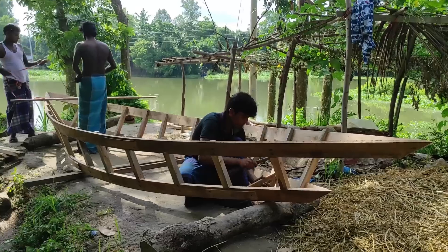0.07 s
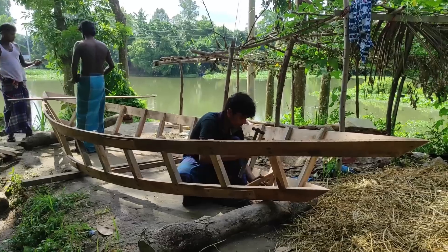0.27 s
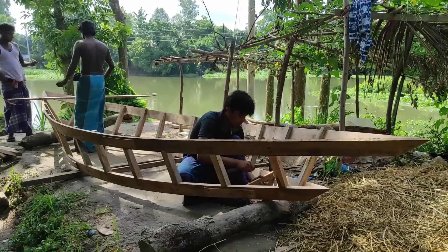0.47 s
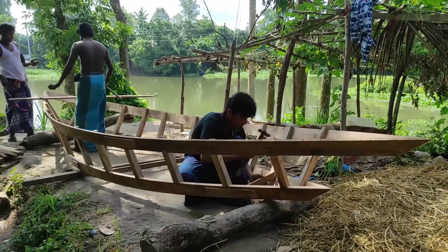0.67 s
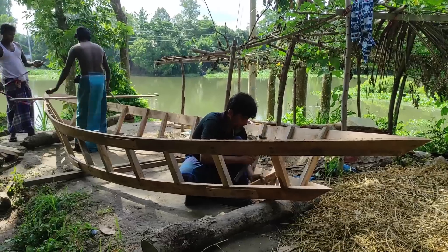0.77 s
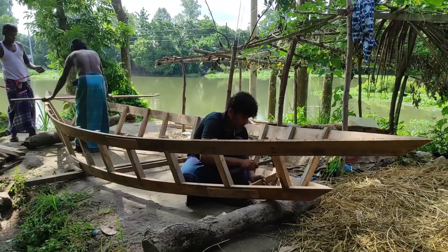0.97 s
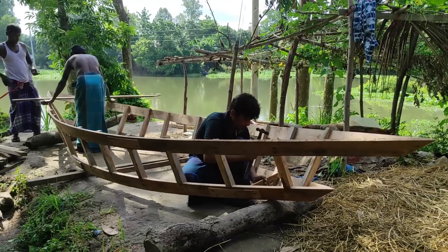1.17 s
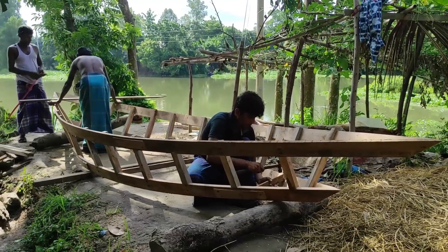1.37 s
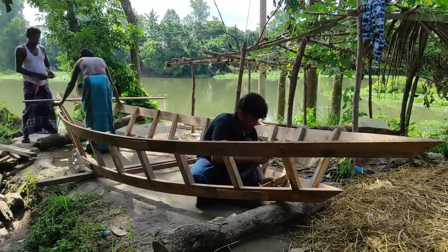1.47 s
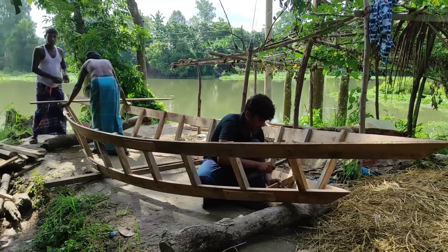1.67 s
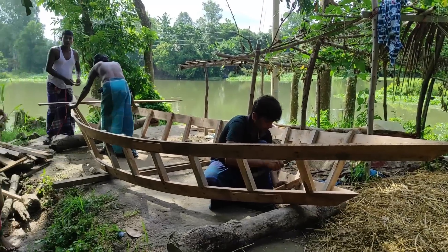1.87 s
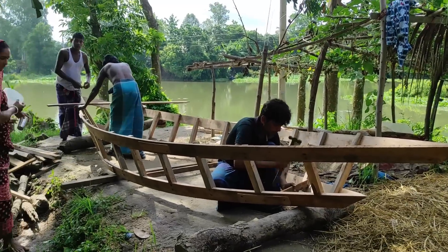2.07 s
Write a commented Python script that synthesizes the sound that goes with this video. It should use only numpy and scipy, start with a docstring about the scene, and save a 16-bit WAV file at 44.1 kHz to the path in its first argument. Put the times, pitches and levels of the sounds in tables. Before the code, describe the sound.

Steel hammer blows knock sharply on boat planks outdoors, fairly even, with faint birds chattering

```python
"""A wooded river bank: a steel hammer drives a nail into a wooden boat frame with five fairly even blows.
Each is a hard noise crack; damped modes and decaying noise then ring as planks, nail and steel.
Three blows have a ticking rebound, a slow noise tail scatters off the trees, and the microphone overloads.
A thin gliding whistle and raspy chatter are birds; shaped noise is air, a low drone and far birds and insects.
"""
import sys
import numpy as np
from scipy import signal
from scipy.fft import rfft, irfft, next_fast_len
from scipy.io import wavfile
from scipy.ndimage import map_coordinates

SR = 44100
rng = np.random.default_rng(int(sys.argv[2]) if len(sys.argv) > 2 else 0)


def wav_record(signal):
    """Record a signal, one row per channel, as 16-bit PCM in the file named by sys.argv[1]."""
    frames = np.transpose(np.atleast_2d(signal))
    bounded = np.clip(frames, -1, 1)
    # unit amplitude maps onto the largest positive 16-bit level
    quanta = np.round(bounded * 32767).astype(np.int16)
    wavfile.write(sys.argv[1], SR, quanta)


N = 93933

# Hammer blows, each part with its own gain:
# (time [s], crack [dB], contact [s], wood [dB], steel ring [dB])
BLOWS = [(.296, -5, 0.0018, -3.5, -4), (0.7647, -6.5, 0.0024, -3.5, -5.5), (1.1894, -1, 0.0021, -1, -1),
         (1.6203, -3.5, 0.0069, 0, 2.5), (2.0671, -2, 0.0037, 0, 3)]
# Light second contacts of the hammer head: (time [s], level [dB])
REBOUNDS = [(0.8051, -9.5), (1.2294, -10), (1.6296, -5)]
# A blow before the start, whose wood still hums: (time [s], level [dB])
EARLIER_BLOW = (-0.12, -4)

# Modes, at their average level before the gain of each blow: (frequency [Hz], level [dB], T60 [s])
FRAME_MODES = [(109.7, -35, 0.45), (142.7, -32.5, .42), (163.9, -25, 0.31), (207.4, -22, .2),
               (241.4, -25, 0.27), (295.6, -26, 0.17), (469, -28, 0.2), (667, -16.5, 0.11),
               (726.7, -24, 0.1), (805.4, -22, 0.16), (905.4, -20, 0.15), (1139, -28.5, 0.24),
               (1268, -32.5, .13), (2002, -22.5, 0.19), (2103, -24, 0.26), (2156, -31, .17),
               (2500, -29.5, 0.063), (2746, -29.5, .16)]  # the wooden frame
NAIL_MODES = [(617, -16.5, 0.028), (997, -2.5, 0.022), (1356, -5, 0.017), (1549, -7.5, 0.031),
              (2510, -4, .032), (3380, -11, 0.015), (5116, -5.5, 0.021), (7440, -3.5, 0.016)]  # the nail and the wood right under it
HEAD_MODES = [(5240, -34, 0.22), (7200, -24, 0.19), (7400, -28.5, 0.082), (7360, -19, 0.11),
              (8350, -33, .12), (8320, -24, 0.22), (8500, -16, 0.15)]  # the hammer head

# Noise colours, only their shape counts: (frequency [Hz], relative density [dB per Hz])
CRACK_COLOUR = [(100, -48.5), (500, -23), (1000, 2), (2400, -0.5), (4200, -4.5), (6200, -3.5), (7500, 4.5),
                (8700, 4), (9800, -20), (15000, -49)]  # steel hitting steel
TIMBER_COLOUR = [(40, -46), (100, -38), (160, -8), (260, 1.5), (500, -6), (800, 2), (1550, -4.5), (2200, 1),
                 (3000, -3.5), (4400, -13), (6300, -15.5), (9000, -26), (10500, -28), (15000, -48)]  # dense plank modes
STEEL_COLOUR = [(3000, -43), (6500, -14), (7200, -5), (7800, 4.5), (8400, -5), (9000, -6), (9800, -23.5),
                (15000, -41)]  # dense ring of hammer and nail
TICK_COLOUR = [(300, -11), (2000, -15), (4300, -7), (5300, -8), (6300, -12), (7400, -5.5), (8600, 1),
               (9800, -21), (15000, -37)]  # rebound contact
SCATTER_COLOUR = [(60, -29), (170, 15), (400, -13.5), (1200, -13), (2300, -4), (3500, -8.5), (5500, -13),
                  (8200, -3), (9800, -19), (15000, -57)]  # hammering scattered by the trees
AIR_COLOUR = [(15, -21), (25, 7.5), (77, 0), (126, -9.5), (279, -6.5), (520, -15.5), (834, -14), (945, -10),
              (1180, -17.5), (1850, -18.5), (2560, -18), (3900, -20.5), (6100, -25.5), (8230, -11.5),
              (9550, -11.5), (12400, -33), (21000, -120)]  # still air
DRONE_COLOUR = [(60, -3), (120, -15.5), (175, -4), (300, -2), (450, -11.5), (900, -25), (2000, -45)]  # faint low drone
CHORUS_COLOUR = [(1200, -16.5), (2500, -3), (3700, 2), (5800, -10), (8200, 0), (9500, -8.5), (11000, -34)]  # far birds and insects

# Decay of the dense plank modes: (frequency [Hz], T60 [s])
TIMBER_T60 = [(150, 0.34), (400, 0.24), (1000, 0.13), (2300, 0.2), (8000, 0.26)]

# Pitch of the falling bird whistle: (time [s], pitch [Hz])
WHISTLE_PITCH = [(.18, 4700), (.39, 4575), (.52, 4440), (.62, 4335), (.79, 4110)]
# Average loudness of the whistle: (time [s], level [dB])
WHISTLE_LEVEL = [(.18, -64), (.205, -51.5), (.29, -49.5), (.35, -57), (.385, -37.5), (.435, -48),
                 (.47, -47.5), (.57, -48), (.625, -43), (.665, -51), (.735, -41), (.79, -57)]
# Bird notes, level before the bird gain: (start [s], length [s], start pitch [Hz], end pitch [Hz], level [dB])
CHATTER = [(-.02, .04, 4090, 3700, -41.5), (0.041, 0.051, 4800, 4300, -40.5),
           (.072, 0.044, 4220, 3450, -36), (.1, 0.031, 4200, 3600, -41.5), (.115, .025, 3440, 2840, -39.5),
           (.135, 0.032, 3000, 2530, -41.5), (.21, 0.084, 3770, 3640, -49.5),
           (.435, .025, 3500, 3080, -38.5), (.46, 0.029, 3020, 2730, -39.5),
           (.48, 0.0442, 3130, 3610, -40.5), (.51, .03, 3200, 2970, -36), (.535, 0.026, 2635, 2500, -40.5),
           (.91, 0.0506, 4650, 4400, -42.5), (.95, 0.071, 2900, 3096, -46)]  # strokes of chatter
FAR_CALLS = [(.08, 0.15, 982, 971, -57.5), (1.3, 0.301, 3510, 3580, -54), (1.953, 0.027, 1960, 1650, -52)]  # faint calls of far birds

# Loudness of the background layers; air and chorus flicker around it: (time [s], level [dB])
AIR_LEVEL = [(0, -53), (.5, -52.5), (.9, -53.5), (1.4, -51.5), (1.9, -54.5)]
DRONE_LEVEL = [(0, -60.5), (.25, -56.5), (.52, -52.5), (.7, -74), (1.1, -63), (2, -71)]
CHORUS_LEVEL = [(0, -48.5), (.11, -42.5), (.22, -54), (.5, -45.5), (.7, -53), (1, -49), (1.5, -54),
                (1.9, -65.5), (2.1, -48)]

# Mix of the hammer layers, before the gain of each blow
CRACK_DB, TIMBER_DB, STEEL_DB, SCATTER_DB, REBOUND_RING_DB = -0.5, -10.5, -19, -23.5, 1
# Rise and decay of the hammer layers
CRACK_RISE_S, CRACK_T60_S, STEEL_T60_S = 0.00041, 0.013, 0.2
TICK_HOLD_S, TICK_T60_S = 0.0016, 0.0096
SCATTER_RISE_S, SCATTER_T60_S = 0.075, 0.54
BUILD_CYCLES = 2.33  # rise time in cycles: bending waves take this long to fill the frame
ALIKE = 0.68  # power share of the dense plank ring that repeats from blow to blow
PATCHY_DB, PATCH_HZ = 1.5, 110.6  # spectral humps: typical depth and knot spacing
# The crack comes back from the hull and the posts
ECHO_DELAY_S, ECHO_DB, ECHO_RISE_S, ECHO_T60_S = 0.024, -18.5, 0.0017, 0.044
LOW_CUT_HZ = 100  # low cut of the hammer sound: its deep bass is thin

OVERTONE_DB = -15.5  # octave in the whistle
BIRD_GAIN_DB = -1.5  # chatter and far calls, trees included
CHATTER_RASP, FAR_RASP = 600, 69.7  # roughness of the notes [random knots per second]
GROVE_DB, GROVE_T60_S, GROVE_RISE_S = -5.5, 0.36, 0.0072  # the trees blur the bird calls

CLIP_TOP, CLIP_HARD = 0.84, 6  # overload ceiling [full scale], sharpness of the knee
TOP_HZ = 15800  # upper band limit of the microphone


def hammer():
    """Steel strikes the nail: crack, ringing frame, echo and trees; rebounds tick and ring the steel."""
    out = np.zeros(N)
    t = np.arange(SR) / SR
    shared = timber(t)
    for s, crack_db, contact, wood_db, steel_db in BLOWS:
        add(out, s, amp(crack_db) * crack(t, contact))
        add(out, s, amp(wood_db) * (wood(t, shared) + tree_scatter(t)))
        add(out, s, amp(steel_db) * steel(t))
        add(out, s + ECHO_DELAY_S, amp(crack_db) * hull_echo(t))
    for s, db in REBOUNDS:
        add(out, s, amp(db) * rebound(t))
    s, db = EARLIER_BLOW
    add(out, s, amp(db) * wood(t, shared))
    low_cut = signal.butter(3, LOW_CUT_HZ, "highpass", fs=SR, output="sos")
    return signal.sosfilt(low_cut, out)


def crack(t, contact):
    """The impact: a noise burst held for the contact time, with the short modes of the nail."""
    impact = noise(CRACK_COLOUR, len(t)) * burst(t, contact, CRACK_T60_S)
    return amp(CRACK_DB) * impact + ring(NAIL_MODES, t, spread_db=3.0)


def burst(t, hold, t60):
    """Full level while the steel is in contact, then a fast decay."""
    decay = np.exp(-np.log(1000) * np.maximum(t - hold, 0) / t60)
    return decay * (1 - np.exp(-(t / CRACK_RISE_S) ** 2))


def wood(t, shared):
    """The frame's clear modes over a dense ring, much the same at every blow."""
    dense = np.sqrt(ALIKE) * shared + np.sqrt(1 - ALIKE) * timber(t)
    return ring(FRAME_MODES, t, spread_db=1.16) + amp(TIMBER_DB) * dense


def timber(t):
    """The crowd of weaker plank modes, each octave with its own build-up and decay."""
    spectrum = rfft(uneven(noise(TIMBER_COLOUR, len(t))))
    octave = np.log2(np.clip(np.fft.rfftfreq(len(t), 1 / SR), 125, 8000))
    out = np.zeros(len(t))
    for hz in 125 * 2 ** np.arange(7):
        weight = np.maximum(0, 1 - abs(octave - np.log2(hz)))  # overlapping octave bands
        band = irfft(spectrum * weight, len(t))
        out += band * fade(t, along(TIMBER_T60, hz), BUILD_CYCLES / hz)
    return out


def steel(t):
    """The bright ring of hammer and nail: a few clear modes in a dense crowd."""
    dense = uneven(noise(STEEL_COLOUR, len(t))) * fade(t, STEEL_T60_S, CRACK_RISE_S)
    return amp(STEEL_DB) * dense + ring(HEAD_MODES, t, spread_db=1)


def hull_echo(t):
    """The crack reflected by hull and posts, as a short diffuse noise burst."""
    return amp(ECHO_DB) * noise(CRACK_COLOUR, len(t)) * fade(t, ECHO_T60_S, ECHO_RISE_S)


def tree_scatter(t):
    """Many small reflections off the trees: noise that swells in after the blow and dies away."""
    return amp(SCATTER_DB) * uneven(noise(SCATTER_COLOUR, len(t))) * fade(t, SCATTER_T60_S, SCATTER_RISE_S)


def rebound(t):
    """A light second contact: a short tick that sets the steel ringing again."""
    tick = noise(TICK_COLOUR, len(t)) * burst(t, TICK_HOLD_S, TICK_T60_S)
    return tick + amp(REBOUND_RING_DB) * steel(t)


def whistle():
    """One thin, slowly falling bird note: a trembling sine and its octave."""
    t = np.arange(N) / SR
    hz = curve(WHISTLE_PITCH) * (1 + 0.0057 * wobble(159.2))
    phase = 2 * np.pi * np.cumsum(hz) / SR
    level = amp(curve(WHISTLE_LEVEL) + 3.2 * wobble(55.5))
    singing = (t > WHISTLE_LEVEL[0][0]) & (t < WHISTLE_LEVEL[-1][0])
    tone = np.sin(phase) + amp(OVERTONE_DB) * np.sin(2 * phase)
    return singing * level * np.sqrt(2) * tone


def bird_notes(notes, rasp_rate):
    """Short gliding bird notes, roughened into narrow rasps by random modulation."""
    out, t = np.zeros(N), np.arange(N) / SR
    for s, length, start_hz, end_hz, db in notes:
        u = np.clip((t - s) / length, 0, 1)  # progress through the note
        phase = 2 * np.pi * np.cumsum(start_hz + (end_hz - start_hz) * u) / SR
        rasp = unit(wobble(rasp_rate) * np.sin(phase) + wobble(rasp_rate) * np.cos(phase))
        out += amp(db) * np.sin(np.pi * u) * rasp
    return out


def grove(x):
    """x with its diffuse answer from the trees: convolution with a decaying noise tail."""
    t = np.arange(SR // 2) / SR
    tail = rng.standard_normal(len(t)) * fade(t, GROVE_T60_S, GROVE_RISE_S)
    return x + amp(GROVE_DB) * signal.fftconvolve(x, tail / np.linalg.norm(tail))[:N]


def river_bank():
    """Background of shaped noise: still air, a low drone and a far chorus of birds and insects."""
    air = amp(curve(AIR_LEVEL) + 0.94 * wobble(4.8)) * noise(AIR_COLOUR, N)
    drone = amp(curve(DRONE_LEVEL)) * noise(DRONE_COLOUR, N)
    chorus = amp(curve(CHORUS_LEVEL) + 2.4 * wobble(20.53)) * noise(CHORUS_COLOUR, N)
    return air + drone + chorus


def ring(modes, t, spread_db):
    """Damped modes with random level and phase at each strike; low ones build up slowly."""
    out = np.zeros(len(t))
    for hz, db, t60 in modes:
        level_chance, phase_chance = rng.standard_normal(2)
        tone = np.sin(2 * np.pi * (hz * t + phase_chance))
        out += amp(db + spread_db * level_chance) * fade(t, t60, BUILD_CYCLES / hz) * tone
    return out


def uneven(x):
    """x with random humps and dips across its spectrum, at rms 1: dense modes ring unevenly."""
    knots = rng.standard_normal(SR // 16)

    def humps(hz):
        return amp(PATCHY_DB * map_coordinates(knots, [hz / PATCH_HZ], mode="wrap"))

    return unit(filtered(x, humps))


def noise(colour, size):
    """Coloured noise of rms 1."""
    return unit(filtered(rng.standard_normal(size), lambda hz: amp(along(colour, hz))))


def filtered(x, response):
    """x times a response of frequency."""
    m = next_fast_len(len(x) + SR // 8)  # padded against wrap-around
    return irfft(rfft(x, m) * response(np.fft.rfftfreq(m, 1 / SR)), m)[:len(x)]


def fade(t, t60, rise):
    """A smooth rise and an exponential decay of 60 dB in t60."""
    return np.exp(-np.log(1000) * t / t60) * (1 - np.exp(-(t / rise) ** 2))


def wobble(rate):
    """A smooth random curve, rate knots a second."""
    return map_coordinates(rng.standard_normal(N // 8), [np.arange(N) * rate / SR], mode="wrap")


def curve(points):
    """(time, value) points joined by straight lines, one value per sample."""
    s, value = np.transpose(points)
    return np.interp(np.arange(N) / SR, s, value)


def along(points, hz):
    """(frequency, value) points joined on a log frequency axis."""
    f, value = np.transpose(points)
    return np.interp(np.log(hz + 1), np.log(f + 1), value)


def amp(db):
    """Decibels to gain."""
    return 10 ** (np.asarray(db) / 20)


def unit(x):
    """x at rms 1."""
    return x / np.sqrt(np.mean(x ** 2) + 1e-20)


def add(track, s, sound):
    """Mix a sound into the track at time s, dropping what falls outside."""
    i = round(s * SR)
    part = sound[max(-i, 0):N - i]
    track[max(i, 0):][:len(part)] += part


def scene():
    """The hammering in front of the birds and the river bank."""
    notes = bird_notes(CHATTER, CHATTER_RASP) + bird_notes(FAR_CALLS, FAR_RASP)
    birds = whistle() + amp(BIRD_GAIN_DB) * grove(notes)
    return (hammer() + birds + river_bank())[None]


def record(dry):
    """The microphone overloads on loud peaks, adding grit but little bass, and cuts the extreme treble."""
    x = dry[0]
    clipped = x / (1 + abs(x / CLIP_TOP) ** CLIP_HARD) ** (1 / CLIP_HARD)
    no_bass = signal.butter(2, 200, "highpass", fs=SR, output="sos")
    grit = signal.sosfilt(no_bass, clipped - x)
    return filtered(x + grit, lambda hz: 1 / np.sqrt(1 + (hz / TOP_HZ) ** 80))[None]


dry = scene()
out = record(dry)
wav_record(out)
```